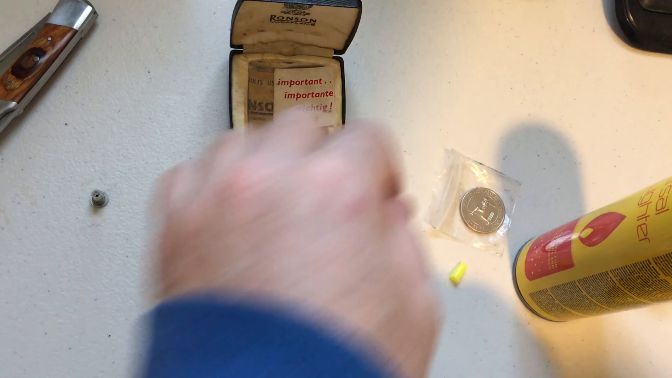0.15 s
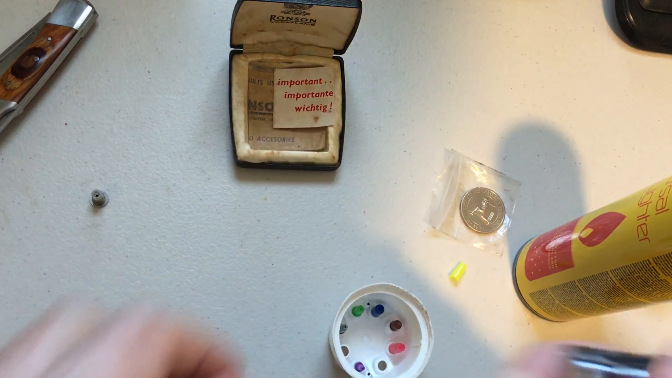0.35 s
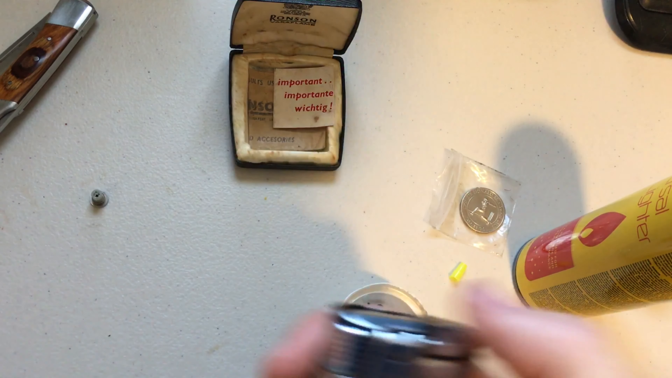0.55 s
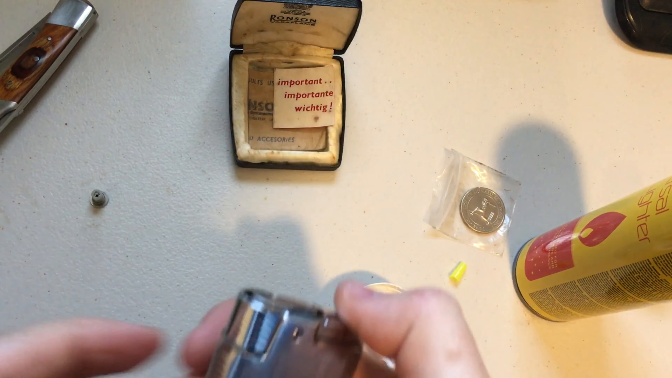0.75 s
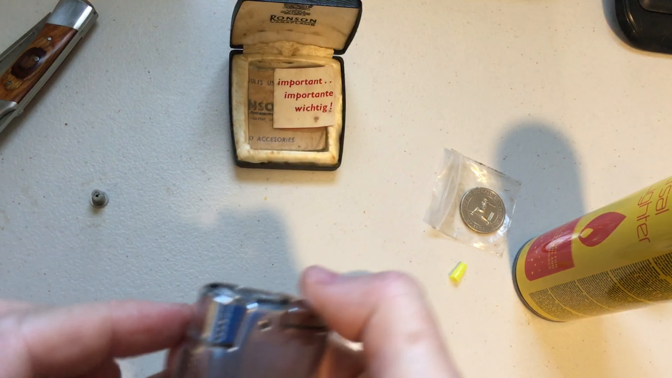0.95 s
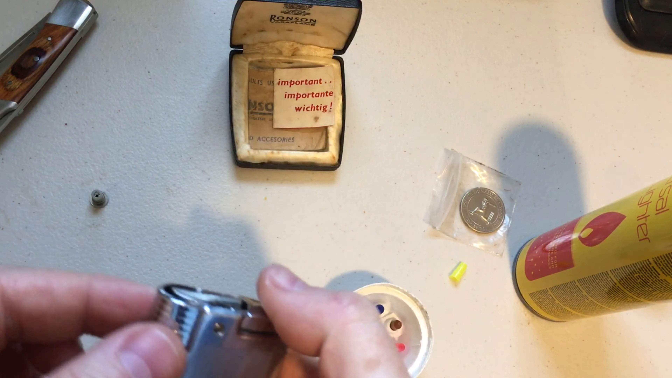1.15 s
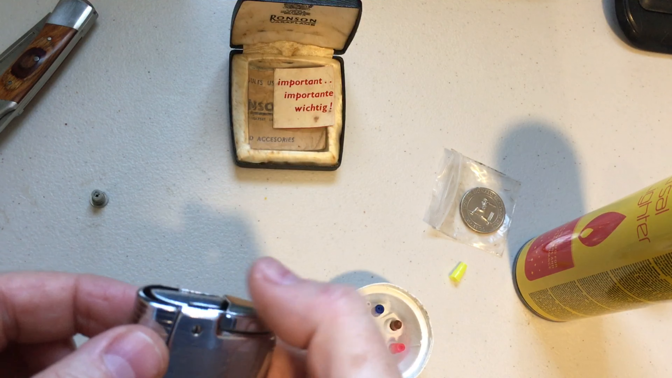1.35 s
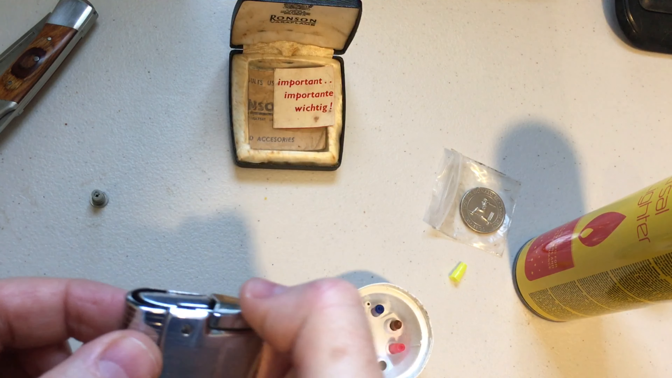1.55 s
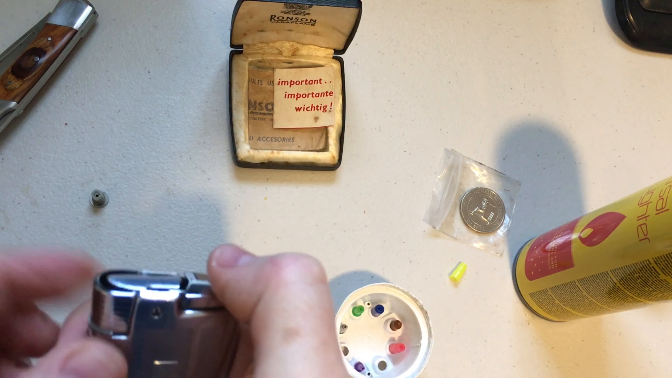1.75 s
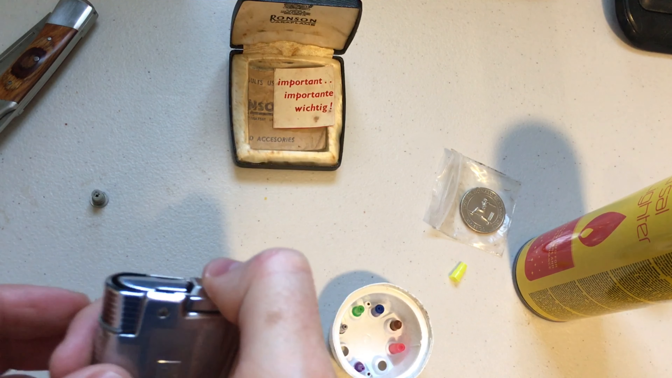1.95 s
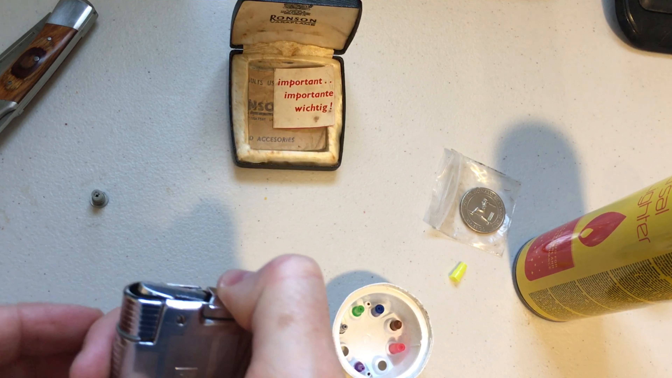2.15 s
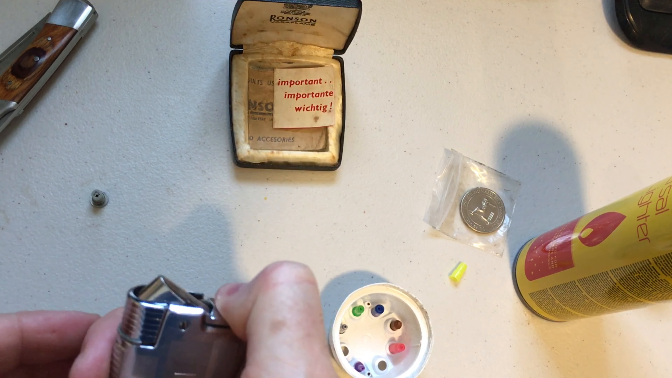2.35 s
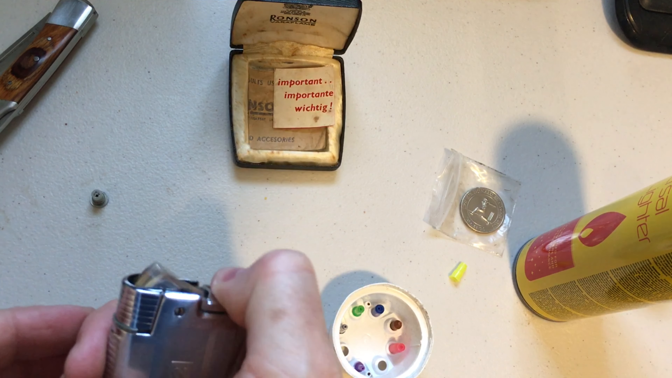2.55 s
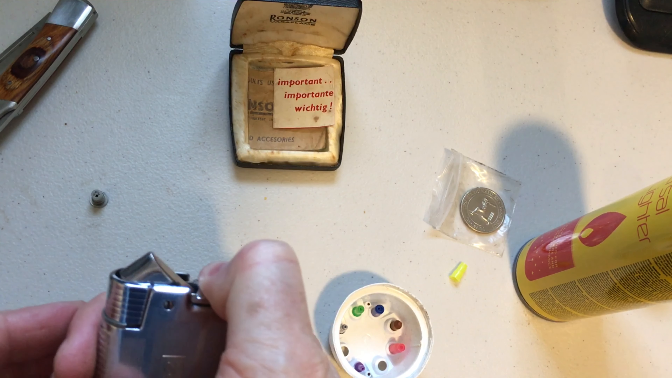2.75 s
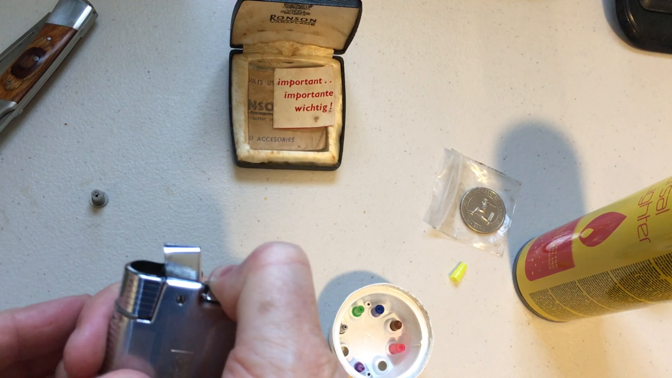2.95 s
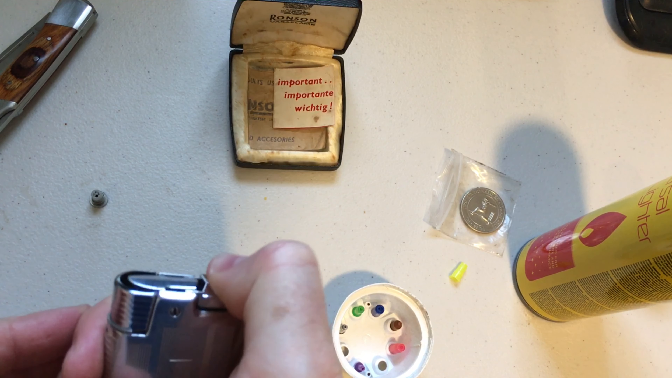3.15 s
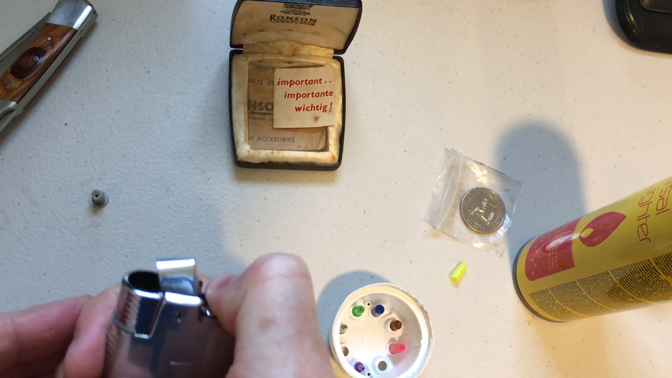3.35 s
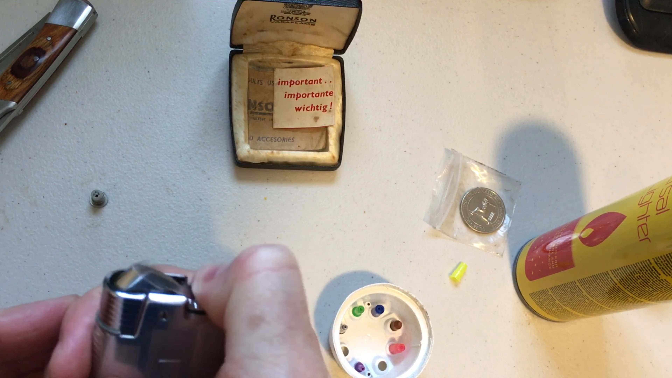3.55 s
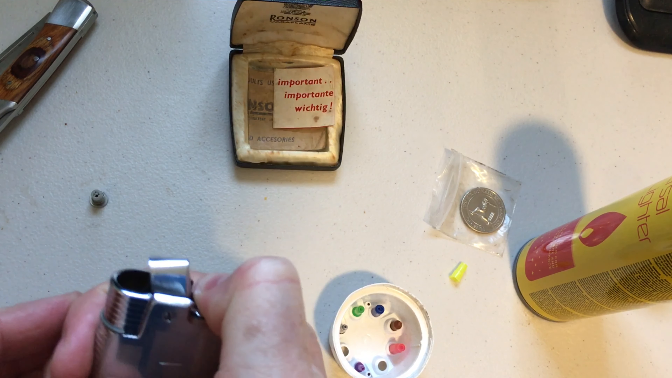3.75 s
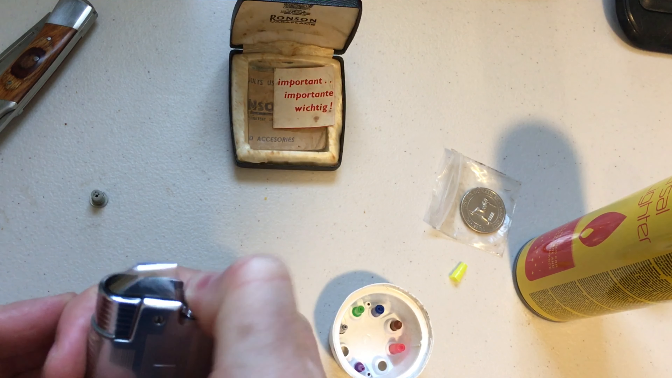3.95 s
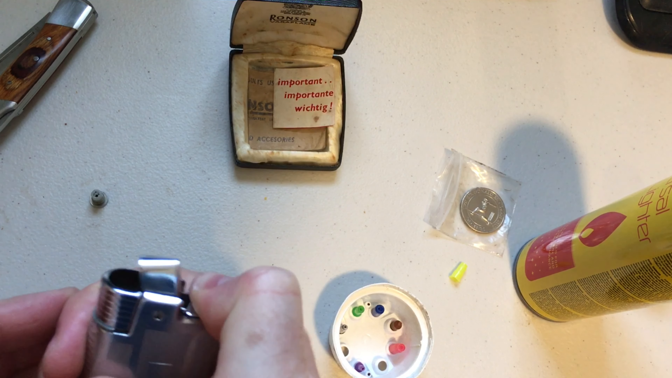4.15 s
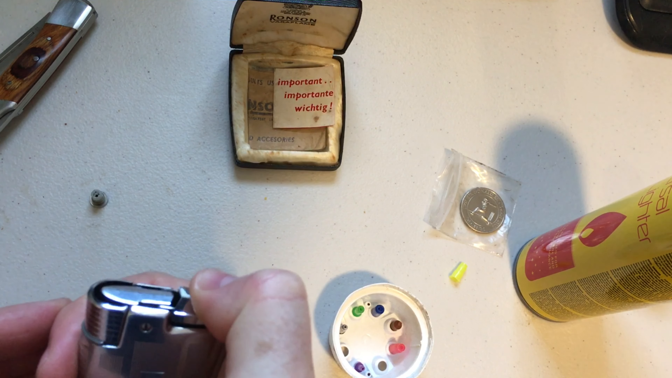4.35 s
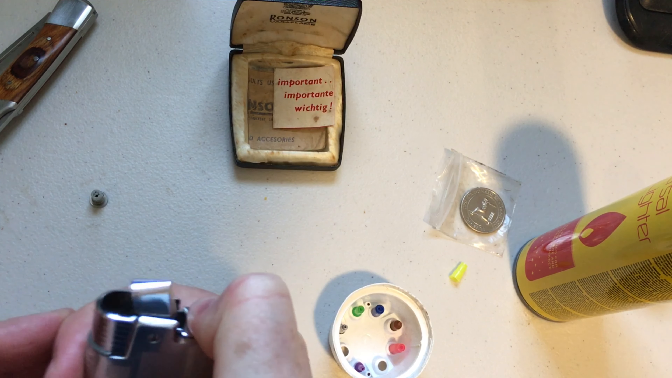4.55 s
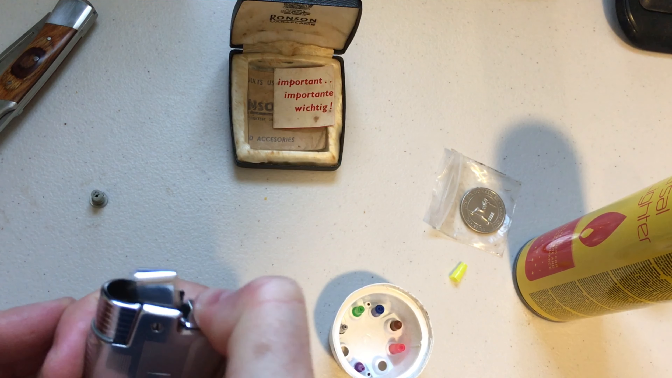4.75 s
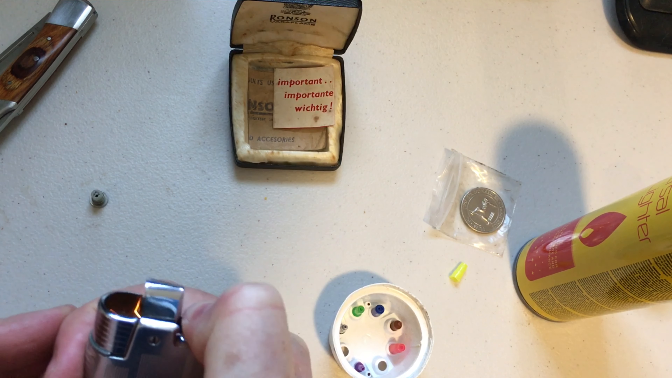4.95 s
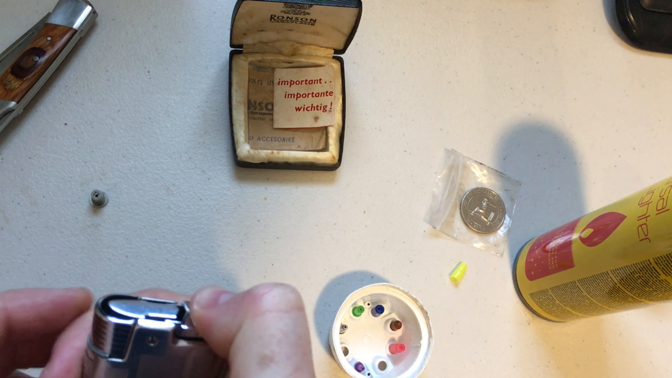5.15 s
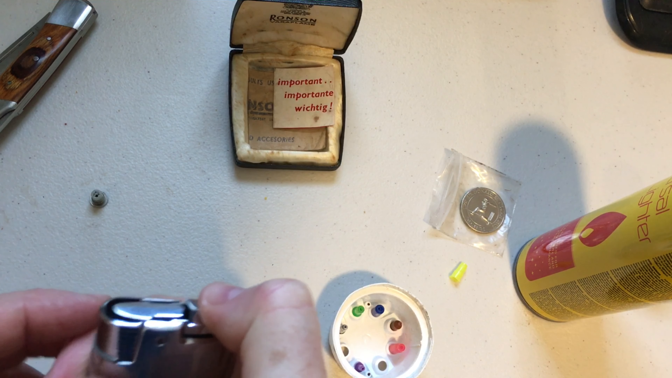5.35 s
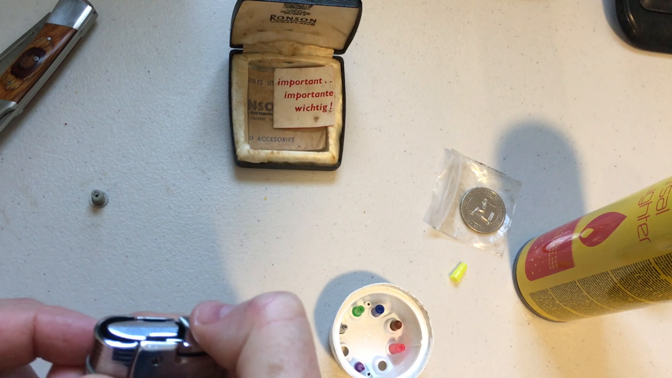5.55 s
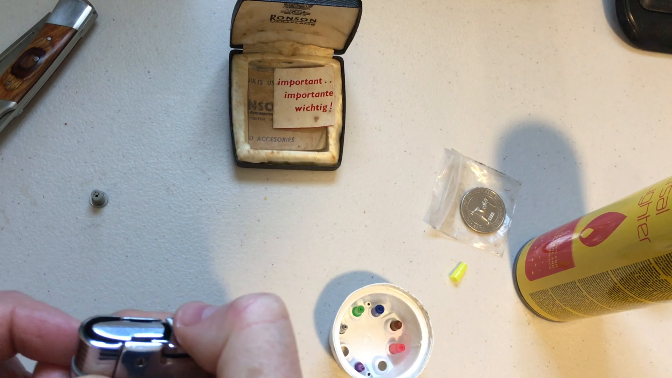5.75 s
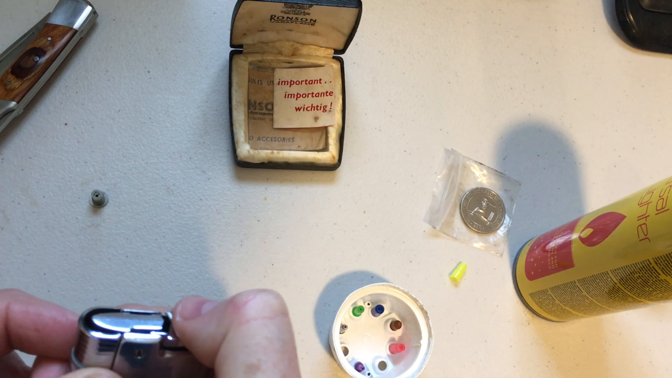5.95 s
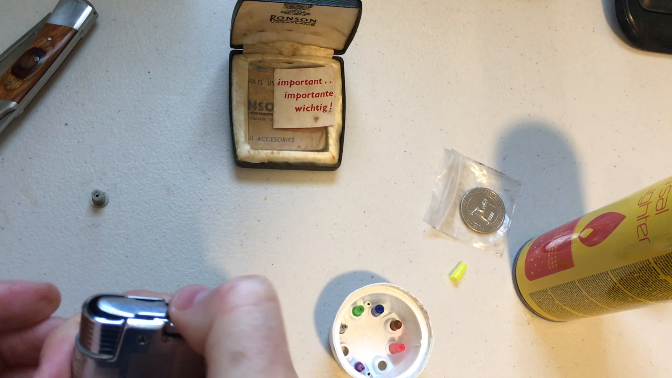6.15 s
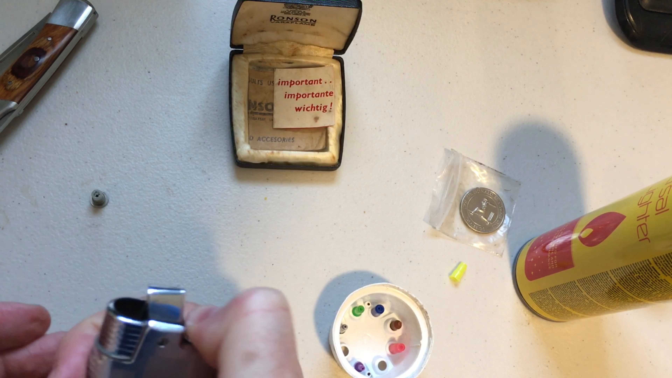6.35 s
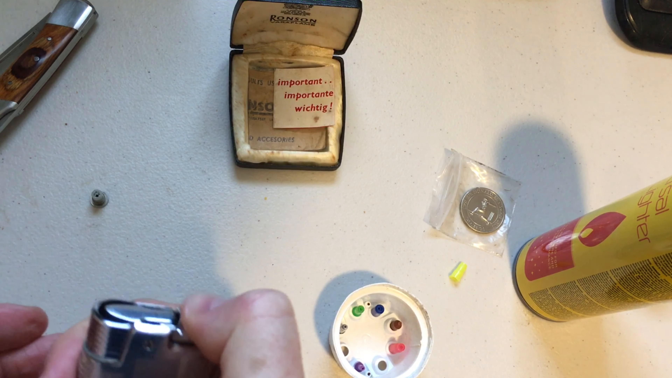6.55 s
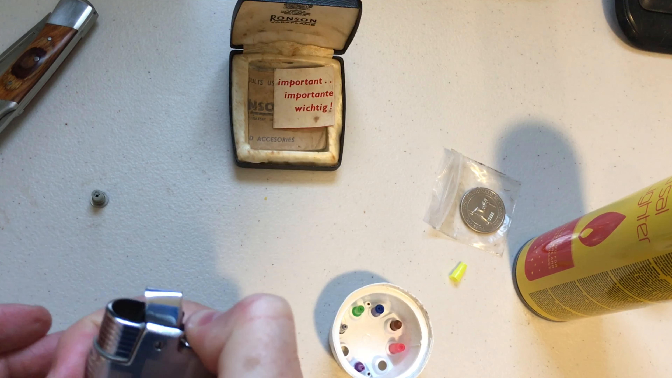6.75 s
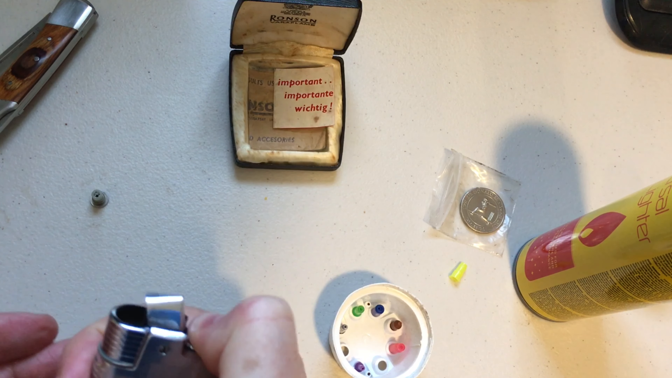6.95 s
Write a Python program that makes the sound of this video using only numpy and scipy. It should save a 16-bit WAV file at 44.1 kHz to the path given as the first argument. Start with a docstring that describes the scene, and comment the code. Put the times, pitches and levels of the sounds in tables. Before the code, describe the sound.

Soft cloth rustle and a dull bump, faint leaking gas with a thin whistle, then nine sharp metallic lighter strikes heard very close.

```python
"""A sleeve of coloured noise brushes a table in a quiet room, a hand rustles and bumps; leaking gas fades in.
The gas is noise split between hood, valve and jet; from 1.6 s a thin wavering tone whistles in the valve.
From 2.3 s a metal lever lighter, just filled, is worked nine times close above the table: each press ticks
in the linkage, grinds the flint wheel and throws the cap open. On each of the eight releases the pawl clicks
twice and the cap snaps shut; the last opening stays open. Chattering forces ring the metal resonances."""
import sys
import numpy as np
from scipy import signal
from scipy.fft import rfft, irfft, next_fast_len
from scipy.io import wavfile
from scipy.ndimage import uniform_filter1d, minimum_filter1d, map_coordinates

SR = 44100
rng = np.random.default_rng(int(sys.argv[2]) if len(sys.argv) > 2 else 0)


def store_pcm(level_fs):
    """Save levels as 16-bit WAV."""
    pcm = np.round(np.clip(level_fs, -1, 1) * 32767).astype(np.int16)
    wavfile.write(sys.argv[1], SR, np.atleast_2d(pcm).T)


N = 312669

# Levels of contacts are relative: each layer adds its own gain.
# Cap hits its open stop. Each row: time in seconds, level in dB, thud in dB, low ring in dB, treble in dB,
# brightest ring in Hz, flint bite length in seconds, wheel grind in dB.
CAP_OPENINGS = [(2.8005, -5.5, -1, 0.5, 0, 3130, 0.0051, -62), (3.2496, -11.5, 1.5, 2, 3, 4500, 0.02, -63),
                (3.5878, -10, 7.5, -2, 0, 4640, 0.023, -63), (3.9716, -8.5, 5, -5, -1, 5330, 0.017, -60),
                (4.5596, -9.5, 6, -2, 0, 6770, 0.013, -51), (4.9397, -4, 5.5, -7, -3.5, 5390, 0.01, -61),
                (6.2573, -7, 11, 5, 1.5, 2970, 0.018, -40), (6.6402, -8, 4.5, -2, 2.5, 3550, .012, -53),
                (6.9585, -10, 5, -5.5, 1, 3590, 0.02, -56)]
# Cap snaps shut. Each row: time in seconds, level in dB, thud in dB, low ring in dB, treble in dB,
# brightest ring in Hz, lead of the first pawl click in seconds, second click in dB.
CAP_CLOSINGS = [(3.072, -9, 3, 1, 5.5, 4550, 0.013, -20), (3.4819, -11, 8, -6, 4, 5500, 0.012, -23),
                (3.8533, -7.5, -0.5, -3.5, 2, 5340, 0.0101, -22),
                (4.2183, -11, 3, 4, 4, 5755, 0.0122, -19.5), (4.8, -9, 3.5, -3, 1.5, 5150, 0.0099, -16.5),
                (5.1249, -5.5, 1, -1, 4.5, 4600, 0.0085, -21.5), (6.5316, -8, 2, 0, 0.5, 3580, 0.0086, -44),
                (6.8546, -9, 6.5, 3.5, -5.5, 4190, 0.009, -26)]
# Resonances of the case, cap open and cap shut. Each row: frequency in Hz, width in Hz, level in dB.
OPEN_MODES = [(1446, 143, -11), (2053, 140, -11), (3220, 130, -8), (3244, 140, 4.5), (3830, 550, 6),
              (4480, 164, 4.5), (5140, 130, -1), (5910, 480.0, -2.5), (6927, 94, -1.5), (8570, 1300, 2),
              (9740, 560, 4.5), (11370, 1000, 0.5), (12800, 940, -3), (14600, 2000, -3)]
SHUT_MODES = [(1310, 1000, -16.5), (1946, 150, -10), (2344, 180, -8), (3500, 600, -3), (4050, 700, -.5),
              (4520, 200, 1.5), (5550, 360, 2.5), (6150, 420, 3), (6950, 850, 0), (8650, 1050, 2),
              (9700, 400, -2.5), (11600, 1300, -1), (13400, 1500, 1), (15400, 1000, 1)]
# Linkage takes up before each strike. Each row: first tick in seconds, middle tick after it in seconds,
# last tick after it in seconds, first, middle and last level in dB, spring ring in dB.
TAKE_UPS = [(2.304, 0.0044, 0.015, -44.5, -36, -27.5, 4), (3.1853, 0.0039, 0.011, -29.5, -32, -27, 2),
            (3.523, 0.0085, .015, -29, -35, -27.5, -5), (3.912, 0.0047, 0.011, -31, -34, -25, -2),
            (4.476, 0.009, .021, -30.5, -33, -24, 7), (4.854, 0.0053, 0.012, -34.5, -31.5, -31.5, 12),
            (6.167, .013, .0168, -40, -41, -32.5, 3), (6.5808, 0.0052, 0.016, -31.5, -29.5, -28.5, 5),
            (6.904, 0.0065, 0.013, -32.5, -27, -30, 6)]
# Stray small ticks, dull knocks and creaks of the lever and hinge. Each row: time in seconds, level in dB,
# scrape length in seconds, spring ring in dB.
STRAY_CONTACTS = [(2.4667, -35, 0.0067, 2), (2.5437, -37.5, .0032, -1), (2.573, -37.5, 0.0024, 14.5),
                  (2.759, -41.5, .002, 1), (2.7845, -41, .002, -1.5), (4.185, -38.5, 0.0021, -12),
                  (4.293, -49, 0.0018, -5), (4.771, -38.5, 0.0021, 3.5), (4.899, -39, .0022, -5.5)]
# Broad spectra of cap knock, linkage, room tail, wheel grind. Each row: frequency in Hz, density in dB per Hz.
KNOCK_COLOUR = [(100, -19), (250, -5.5), (600, -18.5), (1200, -19.5), (2500, -9.5), (4000, 2), (9000, -7),
                (15000, -9), (18000, -6.5)]
LEVER_COLOUR = [(350, -73), (600, -16.5), (1070, -9.5), (1630, -12), (2110, -6.5), (2360, -4), (2700, -3),
                (3460, -1.5), (4250, -3.5), (5070, 3.5), (6760, -2.5), (9270, -3), (10300, -5),
                (13600, -4.5), (15800, -9)]
ROOM_COLOUR = [(100, -1), (1000, 1), (2200, 2), (3700, 4), (4600, 0), (16000, -3)]
GRIND_COLOUR = [(600, -25), (2000, -6.5), (6000, -6), (10000, 0.5), (16000, 3)]
# Spectra of gas in valve, hood and jet. Each row: frequency in Hz, density in dB per Hz.
VALVE_COLOUR = [(3800, -42.5), (4300, -19.5), (4600, -6), (5200, -2), (5450, -2.5), (5750, 2.5),
                (6050, -1.5), (6400, -2), (6900, -9), (8000, -22.5), (12000, -43)]
HOOD_COLOUR = [(500, -13), (1100, -9.5), (1600, -20.5), (1950, -6.5), (2350, -5.5), (2700, -11.5),
               (3050, -1), (3500, -2.5), (3800, -9), (4150, -10), (4600, -5), (8000, -50)]
JET_COLOUR = [(5500, -27), (7200, 0.5), (9700, 1), (10450, -5.5), (11300, 0.5), (12500, -1.5), (15700, -3)]
# Spectra of room tone and sleeve. Each row: frequency in Hz, density in dB per Hz.
ROOM_TONE_COLOUR = [(20, -20.5), (42, 2), (70, -6.5), (101, -5.5), (192, -7.5), (233, -9), (268, -12),
                    (674, -31), (1080, -24), (2300, -30.5), (2880, -31.5), (7000, -40), (15800, -41)]
SLEEVE_COLOUR = [(200, 13), (500, 5), (1500, -3), (3000, -2.5), (6000, -4.5), (15000, -10)]
# Flow of the leaking gas. Each row: time in seconds, level in dB.
FLOW = [(1.2, -67), (1.5, -66.5), (1.6, -56.5), (1.9, -59), (1.98, -50), (2.29, -50.5), (2.35, -54.5),
        (3.73, -55), (4.13, -57.5), (4.39, -58), (5.07, -57.5), (5.3, -62), (5.54, -59), (5.7, -49.5),
        (6.12, -50), (6.43, -52), (7.06, -53)]
# Drops of liquid spit through the valve. Each row: time in seconds, boost in dB.
SPITS = [(1.979, 7.7), (2.232, 3.5)]
# Valve hiss pitch, sinking slightly. Each row: time in seconds, ratio.
VALVE_PITCH = [(5.3, 1), (5.52, 1), (5.8, 0.98)]

SIZE = 4096  # samples in a contact
TIME_S = np.arange(N) / SR
HZ = np.fft.rfftfreq(SIZE, 1 / SR)
AGE_S = np.arange(SIZE) / SR

# the thumb holds the lever half down: the valve hisses less, the hood takes the gas
HELD_SPAN_S = (2.32, 2.8)
HELD_VALVE_DB, HELD_HOOD_DB = -8.5, 3.5
# under the weak flow, jet and hood fade faster; above it, with the cap shut, the valve rushes
WEAK_FLOW_DB = -52
JET_FADE_DB_PER_DB, HOOD_FADE_DB_PER_DB, VALVE_RUSH_DB_PER_DB = 0.86, 0.51, 1
# the jet sings at the edge of its nozzle; level relative to the strongest flow
EDGE_HZ, EDGE_WIDTH_HZ, EDGE_DB, EDGE_FADE_DB_PER_DB = 14200, 1300, -9, 2.5
SPIT_S = 0.01
# cap open: valve higher and weaker, jet freer, hiss mirrored by the cap
OPEN_VALVE_RATIO, OPEN_VALVE_DB, OPEN_JET_DB = 1.044, -1, 1.5
CAP_ECHO_S, CAP_ECHO_DB = 0.001, -7
# the whistle sags, then locks onto a lower, stronger note
WHISTLE_START_S, WHISTLE_HZ, SAG_HZ_PER_S = 1.62, 1044, 52
LOCK_S, LOCKED_HZ, LOCKED_DB = 2.18, 999, 4.5
# scrape lengths of the three take-up ticks
TICK_S, SLIP_S, SEAT_S = .0007, .0016, .002
GRIND_S = 0.084  # the flint wheel turns this long before each strike
# the second tooth clicks with this share of the pawl's lead left
FIRST_TOOTH_DB, SECOND_TOOTH_SHARE = -20, 0.34
# table-top reflection, stronger off the raised cap
TABLE_ECHO_S, TABLE_OPEN_DB, TABLE_SHUT_DB = .0017, -7, -11.5


def undb(db):
    """Decibels to gain."""
    return 10 ** (np.asarray(db) / 20)


def curve(rows):
    """Second column of a time table, joined by straight lines."""
    s, value = np.transpose(rows)
    return np.interp(TIME_S, s, value)


def colour(points, hz):
    """Gain of a (Hz, dB) spectrum at the given frequencies."""
    points_hz, db = np.transpose(points)
    return undb(np.interp(np.log(hz + 1), np.log(points_hz), db))


def noise(points):
    """Coloured noise of unit rms."""
    size = next_fast_len(N)
    gain = colour(points, np.fft.rfftfreq(size, 1 / SR))
    x = irfft(rfft(rng.standard_normal(size)) * gain, size)[:N]
    return x / x.std()


def band(hz, width_hz):
    """Narrow band of noise: an unsteady tone."""
    return noise([(hz - 2 * width_hz, -60), (hz - width_hz, -18), (hz, 0), (hz + width_hz, -18),
                  (hz + 2 * width_hz, -60), (2 * hz + 2 * width_hz, -90)])


def walk(rate_hz):
    """Slow random wander of spread about 0.8."""
    hold = int(SR / rate_hz)
    steps = np.repeat(rng.standard_normal(N // hold + 1), hold)
    return uniform_filter1d(steps, hold)[:N]


def during(spans_s):
    """1 within the (from, to) spans and 0 outside, with soft edges."""
    return uniform_filter1d(sum(1. * ((TIME_S > a) & (TIME_S < b)) for a, b in spans_s), size=1000)


def swell(start_s, attack_s, end_s, release_s, db, growth_db_per_s):
    """Gain that rises, may grow or sink until its end, and is released."""
    attack = np.clip((TIME_S - start_s) / attack_s, 0, 1)
    release = np.clip(1 - (TIME_S - end_s) / release_s, 0, 1)
    return attack * release * undb(db + growth_db_per_s * (np.clip(TIME_S, start_s, end_s) - start_s))


def add(track, s, x):
    """Mix a sound into the track at time s."""
    i = int(s * SR)
    track[i:i + len(x)] += x[:N - i]


def grit():
    """Rough metal catches and lets go: an uneven factor on a force."""
    return undb(4 * np.repeat(rng.standard_normal(SIZE // 32), 32))


def uneven():
    """No two contacts land alike: each favours its own pitches above 2 kHz."""
    ripple_db = np.interp(HZ, np.linspace(0, SR / 2, 80), rng.standard_normal(80))
    return undb(2 * np.clip(HZ / 2000 - 1, 0, 1) * ripple_db)


def contact(length_s, bounce_s, bounce_db):
    """Force of a blow and of its one rebound, each decaying exponentially."""
    late_s = np.maximum(AGE_S - bounce_s, 0)
    return np.exp(-AGE_S / length_s) + undb(bounce_db) * (late_s > 0) * np.exp(-late_s / length_s)


def blow(gain, force):
    """Chatter of tiny contacts under a force envelope rings a body; unit energy."""
    chatter = rfft(rng.standard_normal(SIZE) * force)
    # hard contacts carry all pitches about equally
    chatter /= np.sqrt(uniform_filter1d(abs(chatter) ** 2, size=17) + 1e-12)
    # minimum-phase response: the body rings only after the force
    cepstrum = irfft(np.log(gain + 1e-6))
    cepstrum[1:SIZE // 2] *= 2
    cepstrum[SIZE // 2 + 1:] = 0
    x = irfft(chatter * np.exp(rfft(cepstrum)))[:SIZE // 2]
    return x / np.sqrt(np.sum(x ** 2))


def background():
    """Room tone of noise with a low hum, a faint sine whine and a drone that swells once."""
    out = noise(ROOM_TONE_COLOUR) * undb(-51.5 + .5 * walk(3.3))
    out += band(81.4, 22.04) * undb(-57.0)
    out += undb(-72.5) * np.sin(2 * np.pi * 3148 * TIME_S)
    drone_gain = swell(start_s=1.55, attack_s=.25, end_s=2.2, release_s=.1, db=-59.5, growth_db_per_s=3)
    return out + band(262.5, 22.9) * drone_gain


def handling():
    """Friction noise of sleeve and hand on the table, a rustle and a bump among things; a thin hiss above."""
    sleeve_gain = swell(start_s=-.1, attack_s=.32, end_s=1.1, release_s=.6, db=-54.0, growth_db_per_s=-7.0)
    out = noise(SLEEVE_COLOUR) * sleeve_gain * undb(2.1 * walk(140) + walk(13.54))
    rustle = noise([(700, -20), (1400, 0), (3800, -2), (7000, -8), (12000, -20)])
    rustle_gain = swell(start_s=.18, attack_s=.1, end_s=.36, release_s=.3, db=-66, growth_db_per_s=0)
    out += rustle * rustle_gain * undb(4 * walk(204))
    hiss_gain = swell(start_s=.05, attack_s=.1, end_s=1.0, release_s=.15, db=-72, growth_db_per_s=-2)
    out += band(4730, 260) * hiss_gain * undb(1.2 * walk(12))
    dull = colour([(300, 1), (2500, 4), (5000, -11), (8000, -22)], HZ)
    add(out, .298, undb(-22.5) * blow(dull, np.exp(-AGE_S / 0.0034)))
    return out


def room(x, t60_s, wet_db, echo_s, echo_db):
    """One early reflection and the short tail of a small room, its pattern new every quarter second."""
    step = SR // 4
    diffuse, age_s = noise(ROOM_COLOUR), TIME_S[:step]
    fade = undb(-60 * age_s / t60_s) * np.clip(age_s / 0.0043, 0, 1)
    out = x + undb(echo_db) * np.interp(TIME_S - echo_s, TIME_S, x)
    # the room gathers sound from all sides of the case, which blurs its resonances
    blur = np.exp(2j * np.pi * np.cumsum(380 * walk(900)) / SR)
    spread = (signal.hilbert(x, next_fast_len(N))[:N] * blur).real
    for i in range(0, N - step, step):
        tail = diffuse[i:i + step] * fade
        tail /= np.sqrt(np.sum(tail ** 2))
        add(out, i / SR, undb(wet_db) * signal.fftconvolve(spread[i:i + step], tail))
    return out


def glance(x, db):
    """The sound and its reflection off the table top."""
    return x + undb(db) * np.interp(TIME_S - TABLE_ECHO_S, TIME_S, x)


def whistle():
    """A sagging tone locks onto a firmer, lower note; airy bands above it come out while the lever is held."""
    held, locked = during([HELD_SPAN_S]), during([(LOCK_S, N / SR)])
    sagging_hz = WHISTLE_HZ - SAG_HZ_PER_S * (TIME_S - WHISTLE_START_S)
    hz = sagging_hz + locked * (LOCKED_HZ - sagging_hz)
    unsteady_hz = hz * (1 + .003 * walk(25))
    tone = np.sqrt(2) * np.sin(2 * np.pi * np.cumsum(unsteady_hz) / SR)
    air = band(4120, 260) * undb(-3.0 + 8 * held)
    air += band(11300, 1900) * undb(8) * held
    gain = swell(WHISTLE_START_S, attack_s=.12, end_s=2.74, release_s=.08, db=-69.5, growth_db_per_s=-1)
    return (tone * undb(LOCKED_DB * locked) + air) * gain * undb(.7 * walk(18))


def swirl(x, depth_db, rate_hz):
    """Turbulence: overlapping bands swell and sink on their own."""
    size = next_fast_len(N)
    spectrum, hz = rfft(x, size), np.fft.rfftfreq(size, 1 / SR)
    step_hz = SR / 40
    out = np.zeros(N)
    for k in range(16):
        weight = np.maximum(1 - abs(hz / step_hz - k), 0)
        out += irfft(spectrum * weight, size)[:N] * undb(depth_db * walk(rate_hz))
    return out


def gas(hood_gain_db, valve_gain_db, jet_gain_db, flutter_db):
    """Turbulent gas blows through the hood, hisses in the valve and sizzles as a jet; drops flutter and spit."""
    flow_db = curve(FLOW)
    held = during([HELD_SPAN_S])
    opened_s = [row[0] for row in CAP_OPENINGS]
    shut_s = [row[0] for row in CAP_CLOSINGS] + [N / SR]
    lifted = during(zip(opened_s, shut_s))
    weak_db = np.minimum(flow_db - WEAK_FLOW_DB, 0)
    rush_db = VALVE_RUSH_DB_PER_DB * np.maximum(flow_db - WEAK_FLOW_DB, 0) * (1 - lifted)
    spit_db = sum(db * np.exp(-((TIME_S - s) / SPIT_S) ** 2) for s, db in SPITS)

    hood_db = hood_gain_db + HELD_HOOD_DB * held + HOOD_FADE_DB_PER_DB * weak_db + spit_db
    hood = noise(HOOD_COLOUR) * undb(hood_db)

    # reading the noise faster raises its pitch
    pitch = curve(VALVE_PITCH) * OPEN_VALVE_RATIO ** lifted
    valve = map_coordinates(noise(VALVE_COLOUR), [np.cumsum(pitch)], mode="mirror")
    valve *= undb(valve_gain_db + HELD_VALVE_DB * held + OPEN_VALVE_DB * lifted + rush_db + spit_db / 2)

    jet = noise(JET_COLOUR) * undb(jet_gain_db + OPEN_JET_DB * lifted + JET_FADE_DB_PER_DB * weak_db)
    edge_db = EDGE_DB + EDGE_FADE_DB_PER_DB * (flow_db - flow_db.max())
    jet += band(EDGE_HZ, EDGE_WIDTH_HZ) * undb(edge_db)

    hiss = swirl(undb(flow_db) * (hood + valve + jet), depth_db=1.5, rate_hz=3)
    fade_in = np.clip(TIME_S - .5, 0, 1)
    hiss *= fade_in * undb(flutter_db * walk(200))
    return hiss + lifted * undb(CAP_ECHO_DB) * np.interp(TIME_S - CAP_ECHO_S, TIME_S, hiss)


def take_up(s, middle_s, last_s, first_db, middle_db, last_db, ring_db):
    """Tick, slip and seating scrape of a press, as (s, dB, scrape s, ring dB); the last rings the spring."""
    return [(s, first_db, TICK_S, 0),
            (s + middle_s, middle_db, SLIP_S, 0),
            (s + last_s, last_db, SEAT_S, ring_db)]


def lever(body, gain_db, thud_db):
    """Gritty small contacts of lever and hinge ring the metal; weak ones are duller, each has its own pitches."""
    out = np.zeros(N)
    ticks = [tick for press in TAKE_UPS for tick in take_up(*press)]
    for s, db, length_s, ring_db in ticks + list(STRAY_CONTACTS):
        softness = np.clip((-37 - db) / 5, 0, 1)
        dull = colour([(500, 0.00057), (900, thud_db * softness), (3000, thud_db * softness / 2), (4200, 0)], HZ)
        spring = colour([(1900, 0.0082), (2400, ring_db), (3100, 0.0069)], HZ)
        force = grit() * np.exp(-AGE_S / max(length_s, 1e-4))
        add(out, s, undb(db + gain_db) * blow(body * dull * spring * uneven(), force))
    return out


def grind(rough_db):
    """The flint wheel turns with a gritty, rough noise until the cap hits its stop."""
    turning = sum(undb(db) * ((TIME_S > s - GRIND_S) & (TIME_S < s)) for s, *_, db in CAP_OPENINGS)
    return uniform_filter1d(turning, size=300) * noise(GRIND_COLOUR) * undb(rough_db * walk(240))


def rasp(table, body, lead_s, rise_s, level_db, follow):
    """Rubbing metal gathers speed up to each blow; follow ties its level to the strength of the blow."""
    out = np.zeros(N)
    end_s, db = np.transpose(table)[:2]
    for end, length, strength_db in np.broadcast(end_s, lead_s, db - db.mean()):
        speed = np.exp(np.minimum(AGE_S - length, 0) / rise_s) * (AGE_S < length)
        add(out, end - length, undb(level_db + follow * strength_db) * blow(body, speed * grit()))
    return out


def ratchet(body, gain_db):
    """The pawl slips over two teeth just before the cap shuts: light, bright clicks with a rebound."""
    out, force = np.zeros(N), contact(0.00061, 0.00037, 4.8)
    for s, *_, lead_s, second_db in CAP_CLOSINGS:
        add(out, s - lead_s, undb(FIRST_TOOTH_DB + gain_db) * blow(body, force))
        add(out, s - SECOND_TOOTH_SHARE * lead_s, undb(second_db + gain_db) * blow(body, force))
    return out


def case(modes, knock_db):
    """Gain of the case: its resonances over the broad knock of the contact."""
    hz, width_hz, db = np.transpose(modes)[:, :, None]
    width_hz = np.maximum(width_hz, hz / 40)  # the hand damps every ring
    ring_power = np.sum(undb(db) ** 2 / (1 + 2 * ((HZ - hz) / width_hz) ** 2) ** 2, axis=0)
    knock = undb(knock_db) * colour(KNOCK_COLOUR, HZ)
    return np.sqrt(ring_power + knock ** 2)


def cap(table, body, force, gain_db, bright_db, bright_share):
    """The cap strikes the case; grip shifts thud, low ring and treble, the spot struck brings out one pitch."""
    out = np.zeros(N)
    for s, db, thud_db, ring_db, treble_db, bright_hz, *_ in table:
        grip = colour([(1800, thud_db), (3000, ring_db), (3450, ring_db), (4050, 0),
                       (6500, 0.0015), (9000, treble_db)], HZ)
        spot = 1 + undb(bright_db) / (1 + ((HZ / bright_hz - 1) / bright_share) ** 2)
        add(out, s, undb(db + gain_db) * blow(body * grip * spot * uneven(), force))
    return out


def scene():
    """Lighter with table and room reflections, then gas, whistle, handling and background."""
    opened, shut = case(OPEN_MODES, knock_db=-7.5), case(SHUT_MODES, knock_db=-10.0)
    flint = colour([(300, -25.0), (2000, -10.5), (4000, 0.5), (6500, 6.0), (10000, -2.5), (16000, -3.5)], HZ)
    pawl = shut * colour([(500, -13.5), (2500, 1.0), (6000, -1.5), (15000, 5.0)], HZ)
    linkage = colour(LEVER_COLOUR, HZ) * shut ** 0.3

    lighter = glance(lever(linkage, gain_db=23.5, thud_db=30.5), db=TABLE_SHUT_DB)
    lighter += grind(rough_db=3.0)
    # the harder the flint bites, the softer the cap arrives
    bites_s = [bite_s for *_, bite_s, _ in CAP_OPENINGS]
    lighter += rasp(CAP_OPENINGS, flint, lead_s=bites_s, rise_s=0.0094, level_db=-4.5, follow=-0.39)
    opening_force = contact(0.0007, 0.00059, -8.0)
    openings = cap(CAP_OPENINGS, opened, opening_force, gain_db=21.5, bright_db=3, bright_share=0.019)
    lighter += glance(openings, db=TABLE_OPEN_DB)

    # closing, the hinge swings back and the cap slides onto its seat
    lighter += rasp(CAP_CLOSINGS, flint, lead_s=0.044, rise_s=0.011, level_db=-4.5, follow=0)
    lighter += rasp(CAP_CLOSINGS, shut, lead_s=0.0038, rise_s=0.0027, level_db=8.0, follow=0.34)
    lighter += ratchet(pawl, gain_db=22.5)
    closing_force = contact(0.00083, 0.0038, -25.0)
    closings = cap(CAP_CLOSINGS, shut, closing_force, gain_db=22.5, bright_db=4.0, bright_share=0.021)
    lighter += glance(closings, db=TABLE_SHUT_DB)

    out = room(lighter, t60_s=0.18, wet_db=-19.5, echo_s=0.0059, echo_db=-21.5)
    out += gas(hood_gain_db=-7.0, valve_gain_db=-3.5, jet_gain_db=-2.5, flutter_db=2)
    out += whistle() + handling() + background()
    return out[None]


def record(dry):
    """A fast limiter holds peaks to 1.2 times full scale; a lowpass then cuts the top."""
    lowpass = signal.firwin(161, 15850, fs=SR, window=("kaiser", 7))  # cutoff in Hz
    headroom = np.minimum(1, 1.2 / (abs(dry) + 1e-9))
    gain = uniform_filter1d(minimum_filter1d(headroom, size=15), size=15)
    return signal.fftconvolve(dry * gain, lowpass[None], mode="same")


dry = scene()
out = record(dry)
store_pcm(out)
```